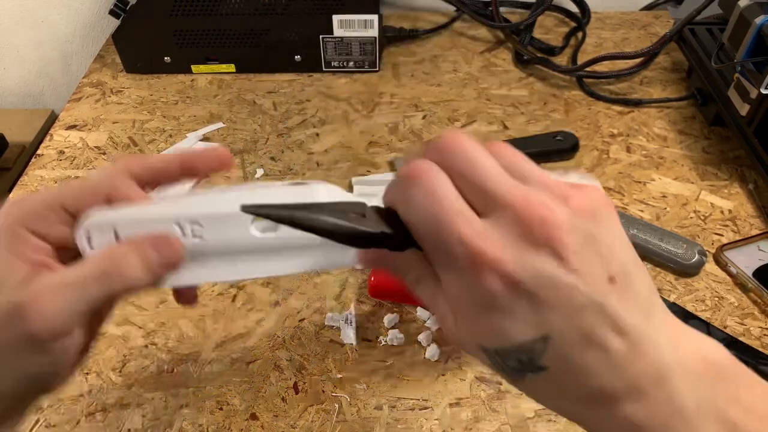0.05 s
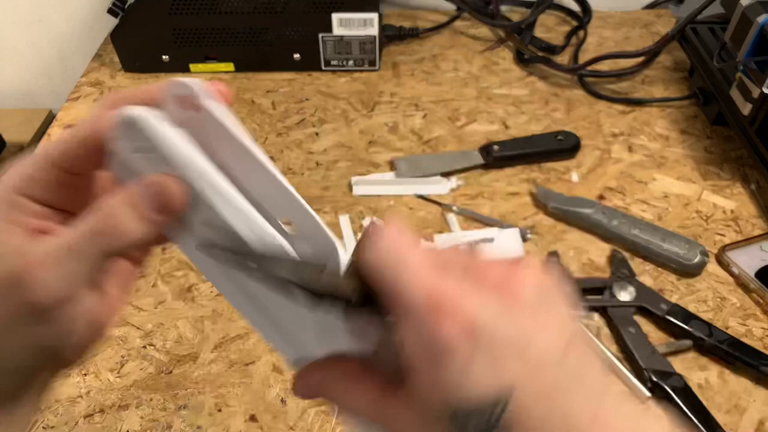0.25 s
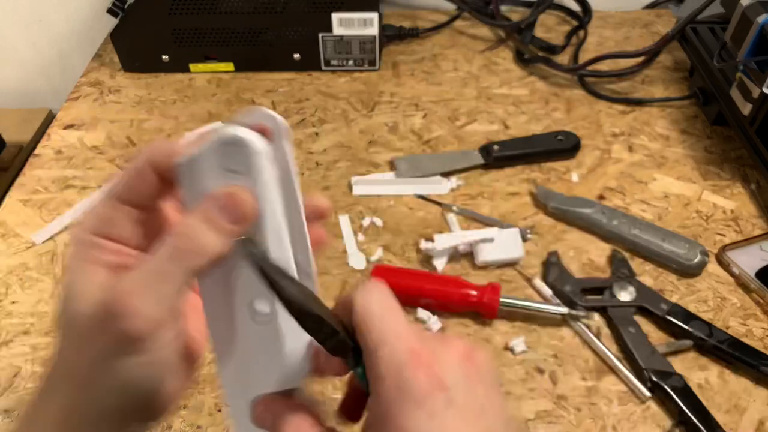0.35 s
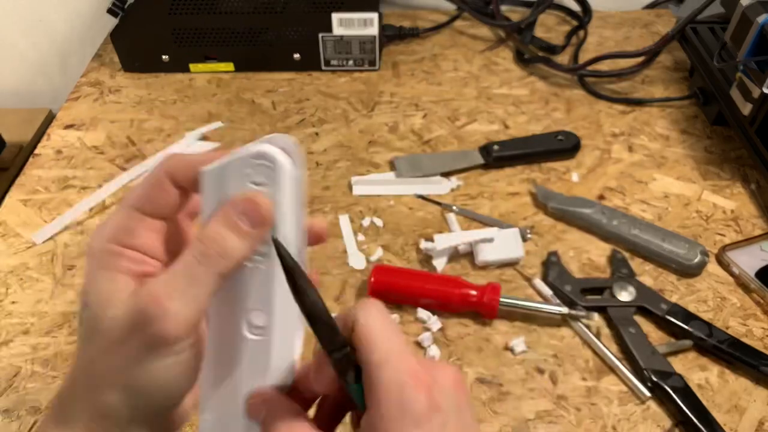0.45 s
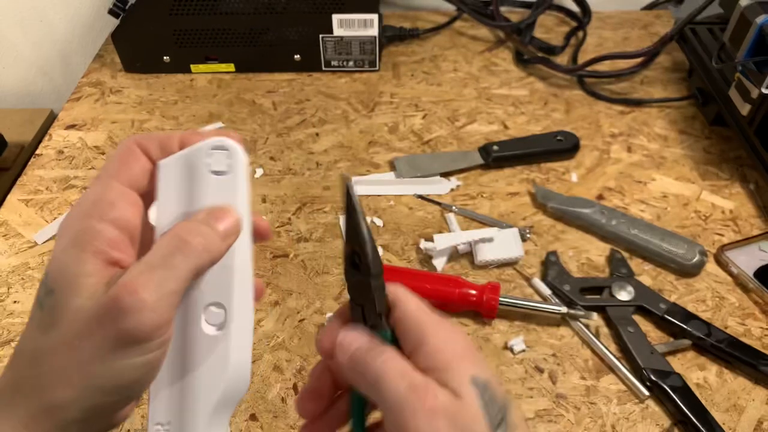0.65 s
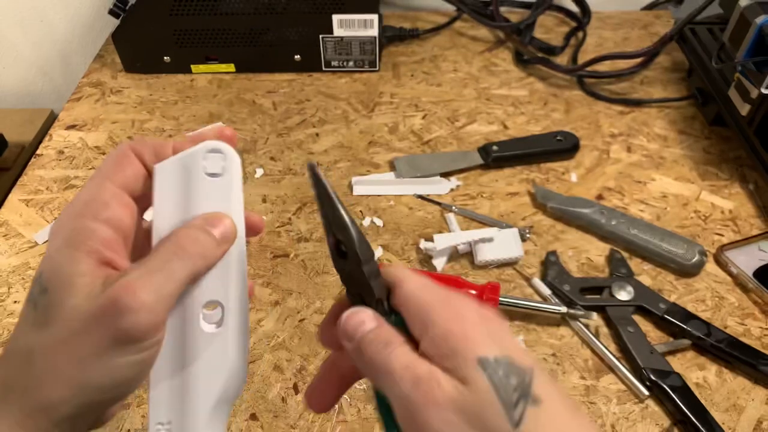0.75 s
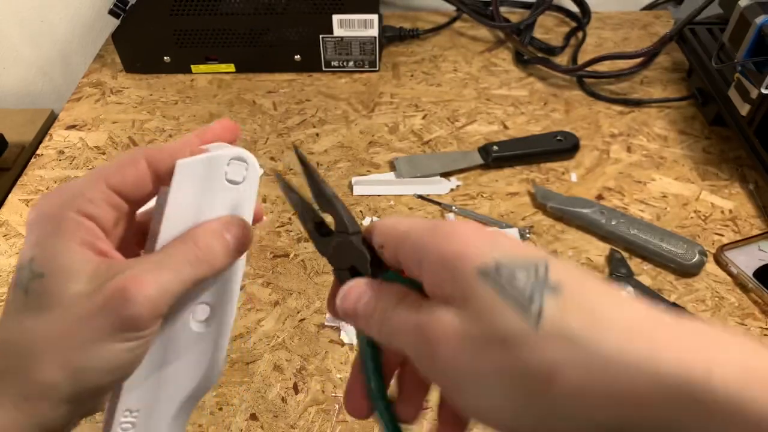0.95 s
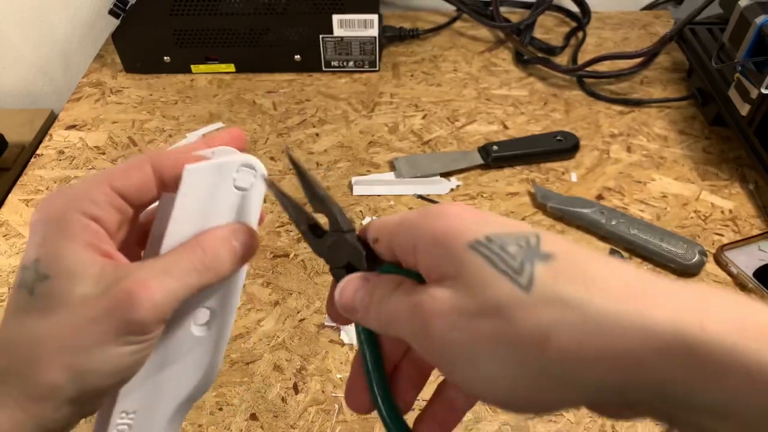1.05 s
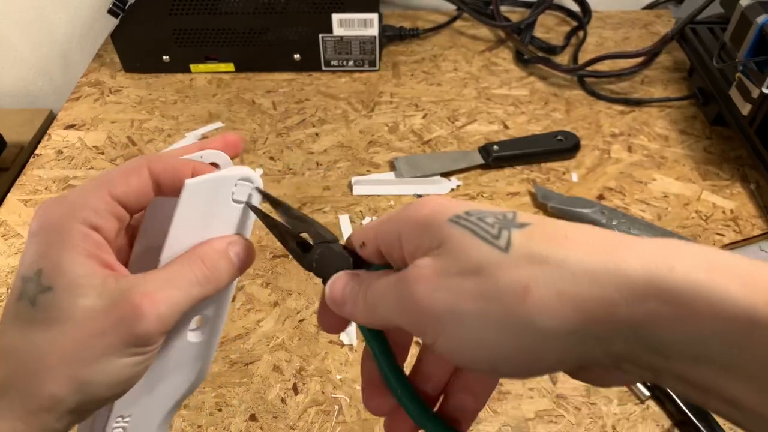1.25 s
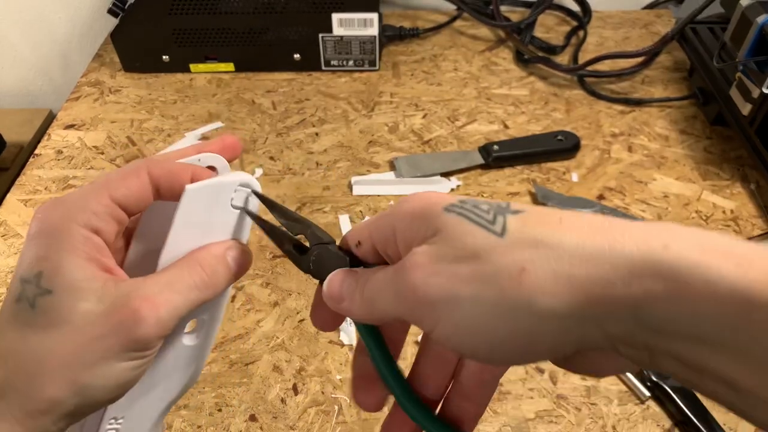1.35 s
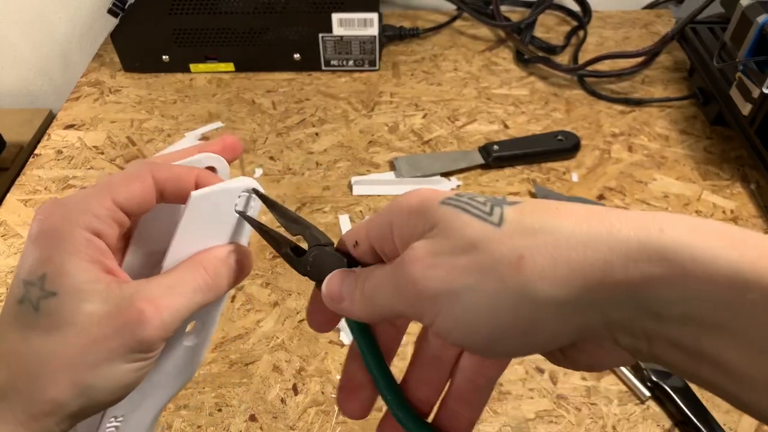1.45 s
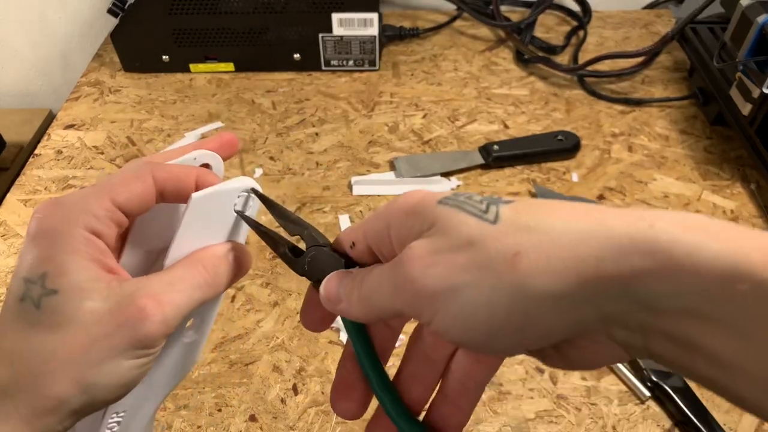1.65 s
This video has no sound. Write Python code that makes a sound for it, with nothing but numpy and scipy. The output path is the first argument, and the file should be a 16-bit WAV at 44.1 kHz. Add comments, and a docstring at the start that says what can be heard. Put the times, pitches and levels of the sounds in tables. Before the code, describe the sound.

Plastic cracking under pliers, heard close in a small quiet room. Soft rubbing and a small tick at 0.1 s lead to a dense burst of sharp cracks from 0.25 to 0.4 s, with a short steel ring and the freed piece knocking on wood until 0.44 s. Scraping fades by 0.55 s. Faint ticks follow, then near silence, a clear tap at 1.2 s, a weaker one at 1.26 s, and a crisp bite at 1.4 s.

```python
"""Fingers and plier jaws rub a hollow plastic part at a wooden workbench in a small, quiet room.
A support is worked out of the part: ticks and cracks ring the plastic's modes, jaws ring on one steel
mode, and the freed piece bounces on the bench. Later the jaws tap the part twice and bite it.
Rubbing is dense small slips and fine hiss, the bench's low modes tremble, and shaped noise and a thin
high whine make the room sound. The direct sound outweighs the echoes, as close to the microphone."""
import sys
import numpy as np
from scipy import signal
from scipy.fft import rfft, irfft
from scipy.io import wavfile

SR = 44100
rng = np.random.default_rng(int(sys.argv[2]) if len(sys.argv) > 2 else 0)


def amplitude_ratio(level_db):
    """Convert a level in decibels to the matching linear amplitude (field) ratio."""
    exponent = np.asarray(level_db, float) / 20
    return 10 ** exponent


def wav_record(signal):
    """Record a signal, one row per channel, as 16-bit PCM in the file named by sys.argv[1]."""
    frames = np.transpose(np.atleast_2d(signal))
    bounded = np.clip(frames, -1, 1)
    # unit amplitude maps onto the largest positive 16-bit level
    quanta = np.round(bounded * 32767).astype(np.int16)
    wavfile.write(sys.argv[1], SR, quanta)


N = 74970
T = np.arange(N) / SR   # seconds

# Quiet air of the room. Each row: pitch in Hz, relative density in dB per Hz.
AIR_SPECTRUM = [(15, -58.5), (25, -24), (48, 7.5), (141, -7.5), (175, -6), (641, -15), (1400, -25),
                (1520, -17), (2410, -27), (11600, -29.5), (16000, -37.5)]
AIR_DB = -71   # rms
WHINE_HZ, WHINE_T60_S, WHINE_DB = 11540, 0.038, -96.5   # thin, steady and high in the room sound

# Fingers and jaws rubbing the part. Each row: time in seconds, body level in dB, treble level in dB.
RUB_LEVELS = [(0, -56.5, -71), (.065, -59.5, -65.5), (.11, -57, -82), (.13, -53.5, -70),
              (.22, -66.5, -69.5), (.3, -56, -53.5), (.42, -49, -65), (.445, -66.5, -72),
              (.47, -61.5, -61.5), (.51, -65, -67.5), (.55, -81, -84.5), (.59, -82, -79), (.62, -81, -81),
              (.7, -80.5, -91), (.74, -86.5, -85.5), (.9, -71, -87), (1.1, -72.5, -101), (1.17, -69, -87),
              (1.33, -75, -96.5), (1.45, -69.5, -89.5), (1.7, -78, -101)]
# Dull body of the rubbing. Each row: pitch in Hz, relative density in dB per Hz.
RUB_BODY_SPECTRUM = [(110, -46), (180, -20.5), (252, -1.5), (400, -7), (600, -9.5), (1200, -14),
                     (2300, -21.5), (3600, -19), (6000, -45.5), (9900, -93)]
# Fine hiss of the rubbing. Each row: pitch in Hz, relative density in dB per Hz.
RUB_TREBLE_SPECTRUM = [(1760, -47.5), (3000, -13.5), (3490, -6.5), (5160, -6), (6010, -2.5), (8010, -12.5),
                       (10800, -6.5), (12200, -17.5), (15500, -27.5)]
RUB_GRAINS_PER_S, RUB_RING_DB = 2700, -10.5   # ringing against the dull body

# Low shaking of the bench. Each row: time in seconds, level in dB.
SHAKE_LEVELS = [(0.0, -58), (0.07, -64.5), (0.198, -59), (0.268, -74), (0.298, -50), (0.368, -51),
                (0.416, -45.5), (0.53, -62.5), (0.828, -77.5), (0.89, -60), (0.942, -72.5), (1.088, -67.5),
                (1.164, -71.5), (1.216, -65), (1.25, -72), (1.272, -61), (1.34, -77.5), (1.424, -63),
                (1.448, -63), (1.496, -65), (1.552, -70), (1.61, -62.5), (1.642, -79), (1.7, -67)]
# Low modes of the bench frame. Each row: pitch in Hz, level in dB, t60 in seconds.
FRAME_MODES = [(62, -2, .15), (82.4, 1, 0.067), (105.3, 2.5, 0.15)]

# Slips that ring the steel jaws. Each row: start in seconds, level in dB.
JAW_SLIPS = [(0.114, -57.5), (.2830, -31)]
JAW_HZ, JAW_T60_S = 3577, 0.068

# Plastic ticks and cracks. Each row: start in seconds, level in dB, crackle length in seconds,
# then five colours in dB, one at each of the colour pitches.
CRACK_EVENTS = [(.1150, -46.5, 0.00392, -17.5, -11.5, 0, -3, 1.5),
                (0.124, -59.5, 0.062, -22.5, -20, 6, 6.5, -9), (.2280, -60.5, 0.0034, -9, 3.5, 1, 2, 8),
                (.2470, -37, 0.0023, -12, -7.5, -2, 1.5, 6.5), (.2750, -31, 0.0091, -20, -5, 4, 4, 3.5),
                (.2840, -32, 0.0039, -23.5, 3.5, -6.5, 5.5, -2.5),
                (.2960, -39.5, 0.0088, -11, 5, -6, -14, -27), (.3350, -44.5, 0.013, -2, 3, 2, 6, 4),
                (.3730, -42, .008, -22, 2, -5.5, 5.5, -11), (.4370, -57.5, 0.0043, -15.5, -16, -12, -9, -3),
                (.6000, -66.5, .010, -8, -4, -2.5, -11, -15.5),
                (.6205, -62, .001, -17, -16.5, -9, -2, -6.5), (.6560, -68.5, 0.025, -3, -2, 2, -4, 2.5),
                (1.1890, -39.5, 0.0015, -2.5, -2, -0.5, -12, -20.5),
                (1.2590, -52, 0.0016, 2, 0.5, -2, -35, -33), (1.3740, -59, 0.01, 0, 2, 4, -21.5, -21),
                (1.3900, -60.5, 0.015, 5, 12, 6.5, -7.5, -7)]
# The colour pitches, low to high, in Hz.
COLOUR_PITCHES_HZ = [500, 1200, 2400, 5000, 11000]
# Main modes of the free part. Each row: pitch in Hz, level in dB, t60 in seconds
# (cracks cap it at the longest t60, rubbing halves it).
PART_MODES = [(519, -3, 0.057), (1002, -6.5, 0.025), (1123, 1, 0.09), (1310, -2, 0.029), (1568, -5.5, .03),
              (1743, -4.5, 0.021), (2307, 2, 0.028), (2862, -1.5, 0.014), (3754, -4.5, 0.023),
              (4090, -3, .02), (3220, -8, 0.01), (4980, -9, 0.011), (7500, -23.5, 0.013)]
CRACKLE_DB = -8.5   # crackle against the first break, before its length thins it
SNAP_DB, SNAP_T60_S = 1, 0.0055   # broad snap of every crack; t60 at 3 kHz
MINOR_DB, MINOR_SPREAD_DB = -7.5, 2.5   # crowd of small modes, and how unevenly a blow wakes them
MINOR_T60_S = 0.009   # up to 3 kHz, shorter above
LONGEST_T60_S = 0.028   # plastic rings no longer
RADIATES_ABOVE_HZ = 300   # the small part sends out no bass

# The freed piece lands on the bench. Each row: time in seconds, level in dB, contact in seconds.
LANDINGS = [(0.2836, -32, 0.0012), (0.3369, -28, .001), (0.3732, -26.5, 0.00071), (.4120, -44.5, .001),
            (.4380, -48, 0.00075)]
# Modes of the bench board. Each row: pitch in Hz, level in dB, t60 in seconds.
BOARD_MODES = [(407.3, 2.5, 0.031), (366.8, -15, 0.064)]
KNOCK_ROOM_DB = -11   # low knocks reach the walls less

# The part held in the jaws. Each row: pitch in Hz, level in dB, t60 in seconds.
HELD_MODES = [(468, -26, .02), (1060, -18.5, 0.015), (1287, -9, .02), (1675, 1, 0.023), (2050, -5.5, 0.012),
              (2500, -2, 0.0075), (2900, -4, 0.011), (3430, 0, 0.0089)]
# Colours of the bite, one at each of the colour pitches, in dB.
BITE_COLOURS = [-10.5, -6, 0.5, -5.5, -15.5]
BITE_S, BITE_DB, BITE_CRACKLE_S = 1.3990, -35, 0.0018   # the jaws close on the part

ROOM_T60_S, ROOM_TREBLE_T60_S, ROOM_DB = 0.21, 0.18, -7
NEAR_T60_S, NEAR_DB = 0.025, -9   # dense first echoes from bench, hands and tools

PORT_HZ, PORT_WIDTH_HZ, PORT_DB = 11450, 500, 5   # microphone port, against the plain sound
DROOP_HZ, DROOP_DB = 12400, -9.5   # the microphone is duller above its port
HISS_DB, HISS_ABOVE_HZ = -89, 12000   # microphone noise; level before its high-pass
LOW_CUT_HZ, CUTOFF_HZ = 48.4, 16900


def rms_one(x):
    """Scale to unit rms."""
    return x / np.sqrt(np.mean(x ** 2) + 1e-20)


def in_time(rows):
    """Columns of a curve, sample by sample."""
    s, *columns = np.transpose(rows)
    return [np.interp(T, s, column) for column in columns]


def high_pass(x, order, hz):
    """Butterworth high-pass."""
    return signal.sosfilt(signal.butter(order, hz, "high", fs=SR, output="sos"), x)


def coloured(x, spectrum):
    """Give noise or grains a spectrum; rms 1."""
    hz, db = np.transpose(spectrum)
    bins_hz = np.maximum(np.fft.rfftfreq(N, 1 / SR), 1)
    gain = amplitude_ratio(np.interp(np.log(bins_hz), np.log(hz), db))
    return rms_one(irfft(rfft(x) * gain, N))


def ring(force, hz, t60):
    """A damped resonance: a unit click sets a sine of height 1 ringing."""
    r, w = amplitude_ratio(-60 / (t60 * SR)), 2 * np.pi * hz / SR
    return signal.lfilter([0, np.sin(w)], [1, -2 * r * np.cos(w), r * r], force + 1e-18)


def air():
    """Noise with the spectrum of the quiet room."""
    return amplitude_ratio(AIR_DB) * coloured(rng.standard_normal(N), AIR_SPECTRUM)


def whine():
    """Noise keeps one narrow high resonance sounding."""
    return amplitude_ratio(WHINE_DB) * rms_one(ring(rng.standard_normal(N), WHINE_HZ, WHINE_T60_S))


def rub():
    """Dense small slips make a dull body and ring the part; noise adds a fine hiss."""
    level_db, treble_db = in_time(RUB_LEVELS)
    slips = rng.standard_normal(N) * (rng.random(N) < RUB_GRAINS_PER_S / SR)
    rung = rms_one(sum(amplitude_ratio(db) * ring(slips, hz, t60 / 2) for hz, db, t60 in PART_MODES[:8]))
    body = rms_one(coloured(slips, RUB_BODY_SPECTRUM) + amplitude_ratio(RUB_RING_DB) * rung)
    hiss = coloured(rng.standard_normal(N), RUB_TREBLE_SPECTRUM)
    return amplitude_ratio(level_db) * body + amplitude_ratio(treble_db) * hiss


def shake():
    """Hands on the bench keep its low modes trembling."""
    push = rng.standard_normal(N + SR)   # the first second lets the modes build up
    modes = [amplitude_ratio(db) * rms_one(ring(push, hz, t60)[SR:]) for hz, db, t60 in FRAME_MODES]
    return amplitude_ratio(in_time(SHAKE_LEVELS)[0]) * rms_one(sum(modes))


def fracture(s, length):
    """One break, then a dying crackle of smaller ones."""
    after = np.clip(T - s, 0, None)
    fade = (T > s) * np.exp(-(after / length) ** 2)
    thinning = np.sqrt(1 + length * SR / 20)   # a longer crackle is weaker at each moment
    force = amplitude_ratio(CRACKLE_DB) * rng.laplace(size=N) * fade / thinning
    force[int(s * SR)] += 1
    return force


def jaws():
    """Slipping jaws ring on one steel mode."""
    force = sum(amplitude_ratio(db) * fracture(s, 0.0049) for s, db in JAW_SLIPS)
    return ring(force, JAW_HZ, JAW_T60_S)


def colour_gain(hz, level_db, colours_db):
    """Level of one blow at one pitch, its colour read between the colour pitches."""
    return amplitude_ratio(level_db + np.interp(np.log(hz), np.log(COLOUR_PITCHES_HZ), colours_db))


def struck(forces, modes, blows):
    """Forces drive the main modes, a row of very short, broad rings and a crowd of minor modes."""
    snap = [(hz, SNAP_DB, SNAP_T60_S * np.sqrt(3000 / hz)) for hz in np.geomspace(500, 15000, 10)]
    minor = []
    for hz in np.geomspace(400, 15500, num=80):
        uneven_db = MINOR_DB + MINOR_SPREAD_DB * rng.standard_normal(len(forces))
        t60 = MINOR_T60_S * min(1, np.sqrt(3000 / hz))
        minor.append((hz * rng.uniform(0.92, 1.02), uneven_db, t60))
    total = np.zeros(N)
    for k, (hz, db, t60) in enumerate(list(modes) + snap + minor):
        gains = np.array([colour_gain(hz, *blow) for blow in blows])
        drive = (amplitude_ratio(db) * gains) @ forces
        total += (-1) ** k * ring(drive, hz, min(t60, LONGEST_T60_S))   # alternating polarity
    return total


def cracks():
    """Every crack rings the same part with a colour of its own."""
    forces = np.array([fracture(row[0], row[2]) for row in CRACK_EVENTS])
    return struck(forces, PART_MODES, [(row[1], row[3:]) for row in CRACK_EVENTS])


def knocks():
    """A soft contact feeds the board through a like resonance: each thump swells for a few cycles and dies."""
    force = np.zeros(N)
    for s, db, width in LANDINGS:
        force += amplitude_ratio(db) * np.exp(-((T - s) / width * 2) ** 2) / (width * SR)
    thumps = np.zeros(N)
    for hz, db, t60 in BOARD_MODES:
        swell = ring(ring(force, hz, t60), hz, t60)
        thumps += amplitude_ratio(db) * swell * 40 / (t60 * SR)   # evens out the gain of the doubled resonance
    return thumps


def bite():
    """The jaws close; the clamped part rings differently."""
    force = fracture(BITE_S, BITE_CRACKLE_S)
    return struck(force[None], HELD_MODES, [(BITE_DB, BITE_COLOURS)])


def room(x):
    """Dense first echoes, then a diffuse tail whose treble dies first."""
    t = T[:SR // 2]
    near, noise = rng.standard_normal((2, len(t)))
    dull = signal.sosfilt(signal.butter(2, 3500, fs=SR, output="sos"), noise)
    tail = dull * amplitude_ratio(-60 * t / ROOM_T60_S) + (noise - dull) * amplitude_ratio(-60 * t / ROOM_TREBLE_T60_S)
    tail *= np.clip(t / 0.0025, 0, 1)   # the tail fades in
    first = near * amplitude_ratio(-60 * t / NEAR_T60_S)
    echoes = amplitude_ratio(ROOM_DB) * rms_one(tail) + amplitude_ratio(NEAR_DB) * rms_one(first)
    return signal.fftconvolve(x, echoes / np.sqrt(len(t)))[:N]


def scene():
    """All sources at the bench; the plastic, jaws and knocks also reach the walls."""
    clicks = high_pass(cracks() + bite() + jaws(), 2, RADIATES_ABOVE_HZ)
    thuds = knocks()
    echoes = room(clicks + amplitude_ratio(KNOCK_ROOM_DB) * thuds)
    return (clicks + thuds + echoes + shake() + rub() + air() + whine())[None]


def band_limit(x):
    """A steep low-pass at the top of the band."""
    return signal.sosfilt(signal.butter(12, 17100, fs=SR, output="sos"), x)


def record(dry):
    """Microphone port resonance, treble droop and hiss, then top and bottom cut."""
    r, w = np.exp(-np.pi * PORT_WIDTH_HZ / SR), 2 * np.pi * PORT_HZ / SR
    edge = (1 - r * r) / 2
    port = signal.lfilter([edge, 0, -edge], [1, -2 * r * np.cos(w), r * r], dry)
    x = dry + amplitude_ratio(PORT_DB) * port
    hiss = amplitude_ratio(HISS_DB) * high_pass(rng.standard_normal(x.shape), 4, HISS_ABOVE_HZ)
    low = signal.sosfiltfilt(signal.butter(6, DROOP_HZ, fs=SR, output="sos"), x)
    drooped = low + amplitude_ratio(DROOP_DB) * (x - low)
    top_cut = signal.cheby2(10, 50, CUTOFF_HZ, fs=SR, output="sos")
    mix = high_pass(signal.sosfilt(top_cut, drooped + hiss), 2, LOW_CUT_HZ)
    return band_limit(mix)


dry = scene()
out = record(dry)
wav_record(out)
```